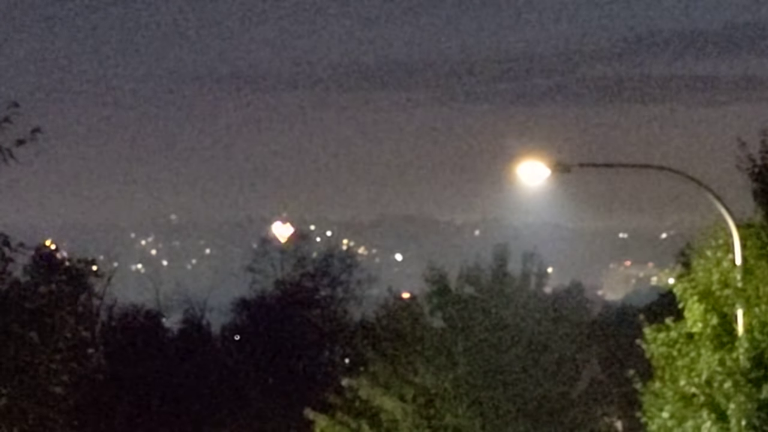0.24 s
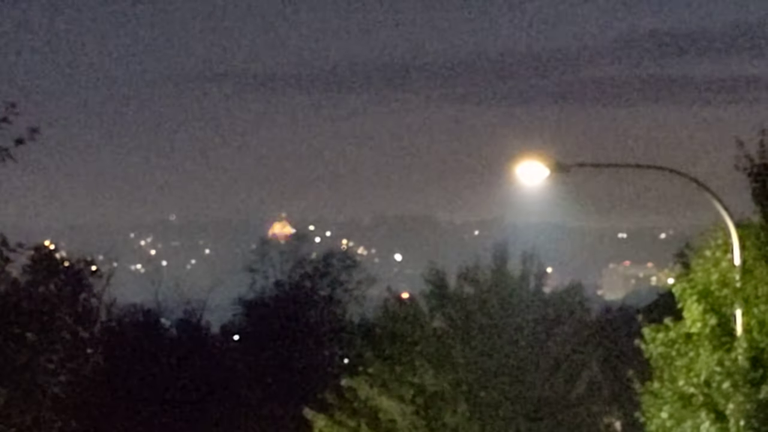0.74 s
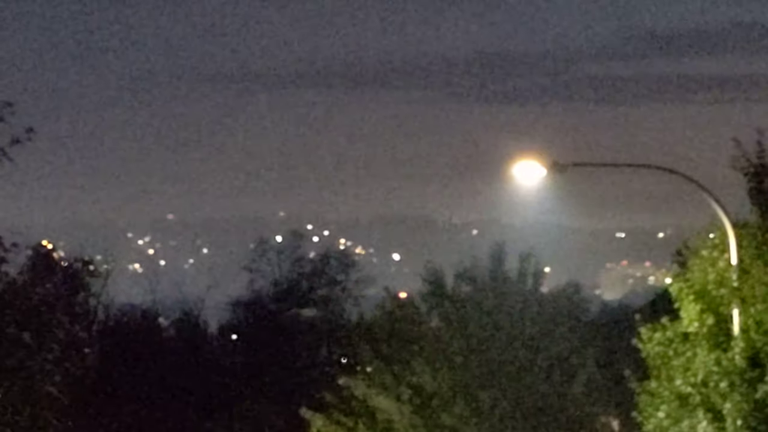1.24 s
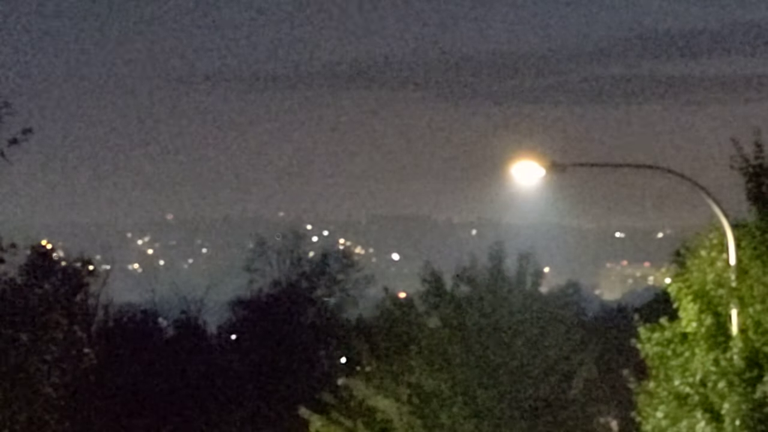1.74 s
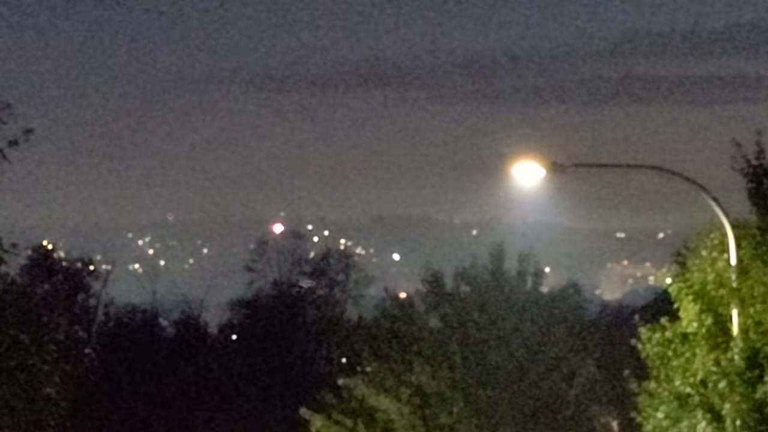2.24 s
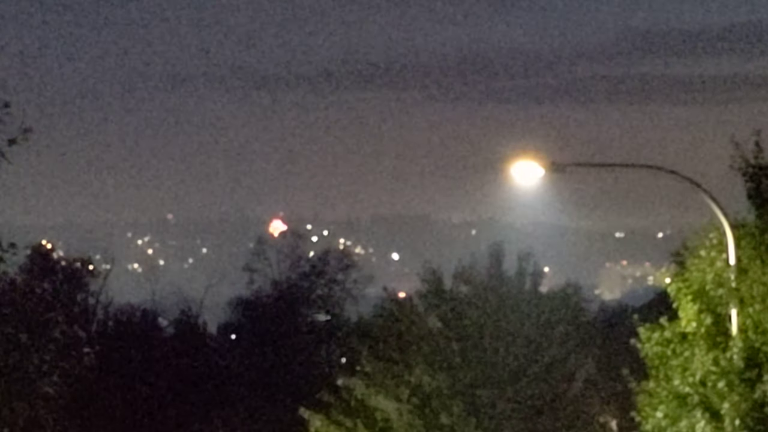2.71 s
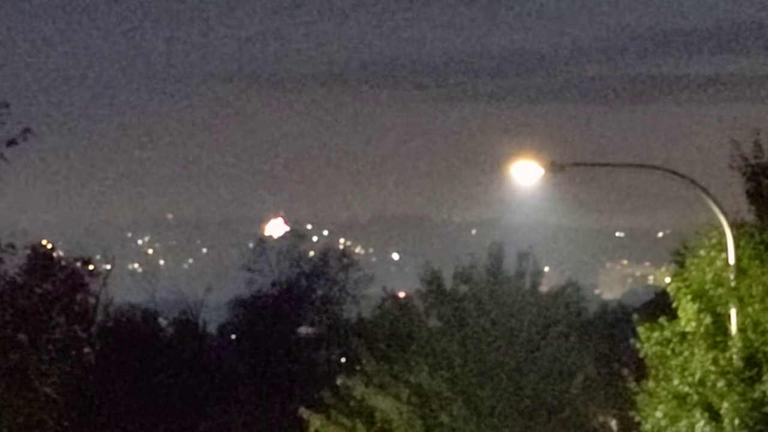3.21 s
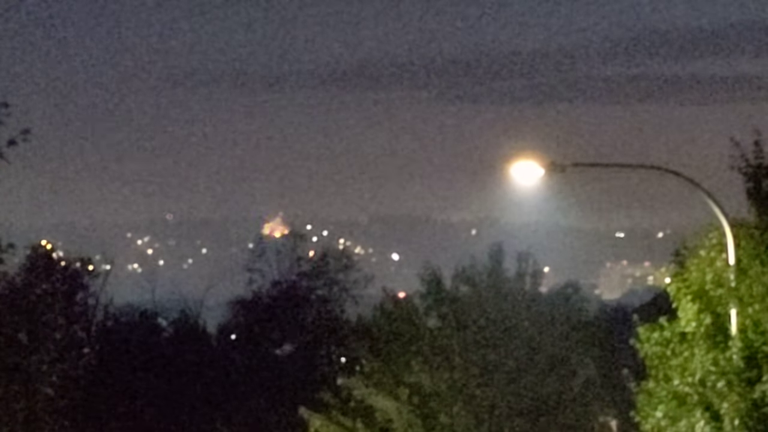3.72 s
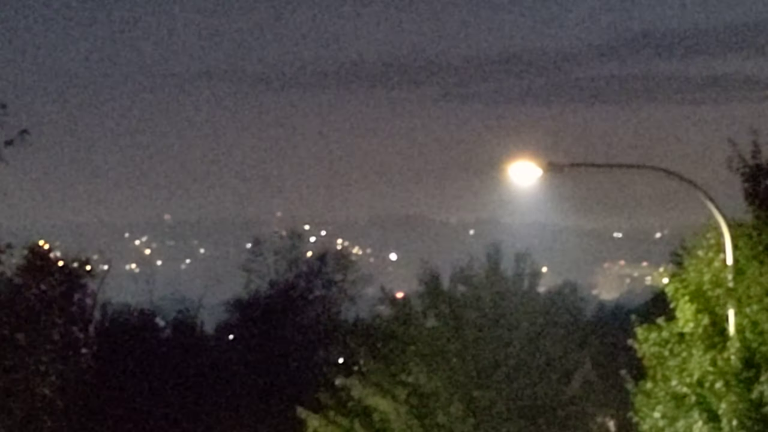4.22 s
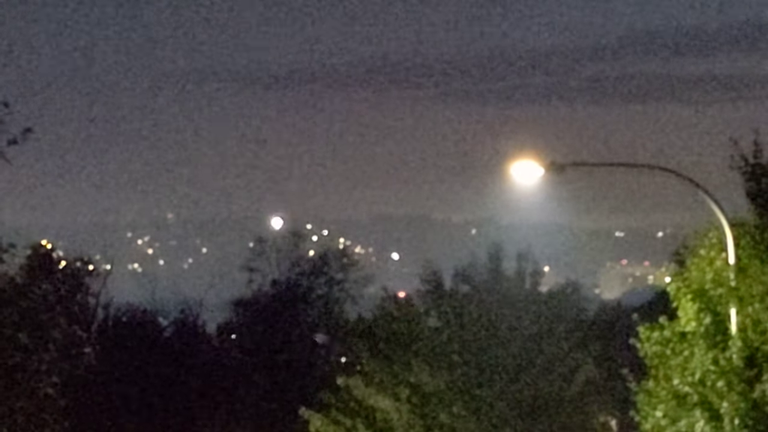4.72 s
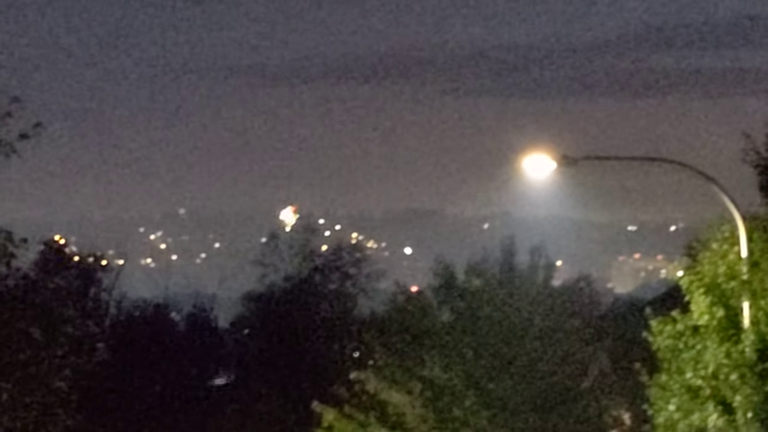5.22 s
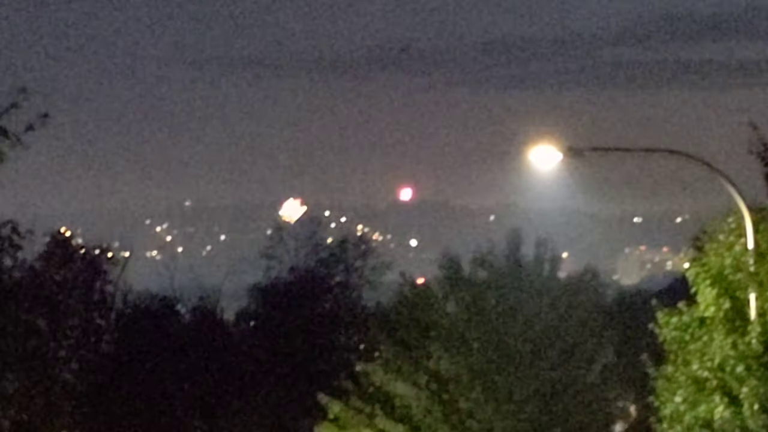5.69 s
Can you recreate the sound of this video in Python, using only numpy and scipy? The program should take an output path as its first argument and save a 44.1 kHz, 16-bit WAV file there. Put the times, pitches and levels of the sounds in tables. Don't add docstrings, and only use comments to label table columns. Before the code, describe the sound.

A quiet night outdoors above a town, with steady low road hum, gently swelling tyre hiss and faint microphone hiss. At 0 s the soft clatter and rumble of an earlier firework is fading. At 1.3 s a strong shell arrives: a short knock from the right, a heavier deep thump answering off a wall on the left about 40 ms later, then uneven rolling echoes. A second, lighter knock at 1.87 s brings a low flutter, and the rumble dies slowly with soft swells. Tiny dull pops from farther shells come at 2.5 and 2.9 s, in a quick run around 3.6 s, then near 3.84, 3.98 and 4.27 s. At 4.37 s a nearer shell gives a small bright snap and low thud; at 4.72 s a loud knock and boom clatter back with a quick high flutter and thick rumble. A weak last bang at 5.29 s trails off in echoes towards 6 s.

```python
import sys
import numpy as np
from scipy import signal
from scipy.fft import rfft, irfft, next_fast_len
from scipy.io import wavfile
from scipy.ndimage import uniform_filter1d

SR = 44100
rng = np.random.default_rng(int(sys.argv[2]) if len(sys.argv) > 2 else 0)


def natural_amplitude(level_db):
    exponent = np.asarray(level_db, float) / 20
    return 10 ** exponent


def generate_wav(sig):
    pcm = np.round(np.clip(np.atleast_2d(sig).T, -1, 1) * 32767).astype(np.int16)
    wavfile.write(sys.argv[1], SR, pcm)


N = 262395
HZ = np.fft.rfftfreq(2048, 1 / SR)
FRAMES = np.arange(N // 512 + 5) * 512 / SR


def evened(x):
    return x / np.sqrt(np.mean(x ** 2) + 1e-30)


def read(points, hz):
    f, value = np.transpose(points)
    return np.interp(np.log(hz + 1), np.log(f + 1), value)


def closed(points, hz):
    outside = (hz < points[0][0]) | (hz > points[-1][0])
    return np.where(outside, -120, read(points, hz))


def pair(left, other, same):
    same = np.clip(same, -1, 1)
    return np.array([left, same * left + np.sqrt(1 - same ** 2) * other])


def noise(db, same, patchy_db):
    a, b, c, d, patches = rng.standard_normal((len(FRAMES), len(HZ), 5)).T
    patches = uniform_filter1d(patches, size=12, axis=0)
    patches = evened(uniform_filter1d(patches, size=4, axis=1))
    spectra = pair(a + 1j * b, c + 1j * d, same[:, None]) * natural_amplitude(db + patchy_db * patches)
    sound = signal.istft(spectra, nperseg=2048, noverlap=1536)[1]
    return evened(sound[:, :N])


def lumps(per_s, depth_db):
    knots = rng.standard_normal(2000)
    drift = np.interp(np.arange(N) * per_s / SR, np.arange(len(knots)), knots)
    return evened(natural_amplitude(depth_db * drift))


def add(mix, s, sound, pan_db):
    part = mix[:, round(s * SR):][:, :len(sound.T)]
    sides = natural_amplitude(np.array([[.5], [-.5]]) * pan_db)
    part += (sound * sides)[:, :part.shape[1]]


def packet(hz, cycles, sag=0.074, narrow=3.02):
    u = np.arange(-1.5 * cycles / hz, 1.553 * cycles / hz, 1 / SR) * hz
    bell = np.exp(-(narrow * u / cycles) ** 2)
    swing = -np.cos(2 * np.pi * (u - sag * u ** 2 / cycles)) * bell
    return swing - bell * swing.sum() / bell.sum()


def thump(mix, s, db, hz, cycles, pan_db):
    wave = packet(hz, cycles)
    add(mix, s - len(wave) / 2 / SR, natural_amplitude(db) * wave, pan_db)


# (pitch [Hz], level [dB per Hz])
TOWN = [(13, -62), (22, -20.5), (35, -2), (81, 1), (108, -2.5), (213, -2), (273, -6.5), (404, -12),
        (438, -13), (585, -12), (849, -12.5), (1000, -4.5), (2240, -35), (3050, -51.5), (3960, -68),
        (6710, -120)]
# (pitch [Hz], likeness [-1 to 1])
TOWN_SAME = [(60, 1), (100, 0.81), (180, 0.89), (300, 0.53), (520, 0.88), (890, 0.75), (1520, 0.18),
             (2600, 0.076)]
# (time [s], tyre hiss [dB], nearness that lifts the treble [dB])
CARS = [(0, -6.5, -6.5), (0.401, -6, 4), (0.801, -2.3, 18), (1.201, -4, 7), (1.6, -5, 3.5),
        (2.299, -1.5, 10.5), (2.598, -3.5, 5), (2.903, 2, 2.5), (3.302, -1.5, 3.5), (3.7, -4, 3),
        (4.05, -3.2, 3), (4.25, -3, 8.5), (4.501, -4.5, 4.5), (5.3, -4, 8), (5.95, -6.5, 1.5)]


def town():
    town_db = -47.5
    s, tyre_db, near_db = np.transpose(CARS)
    hump = np.exp(-(np.log2((HZ + 1) / 1050) / 0.45) ** 2)
    treble = np.clip(np.log2((HZ + 1) / 1100), 0, 1.1)
    cars = hump[:, None] * np.interp(FRAMES, s, tyre_db)
    cars = cars + treble[:, None] * np.interp(FRAMES, s, near_db)
    return natural_amplitude(town_db) * noise(closed(TOWN, HZ)[:, None] + cars, read(TOWN_SAME, HZ), 0.74)


# (pitch [Hz], level [dB per Hz])
HISS = [(1800, -20.5), (2800, 2), (3400, -2), (3800, 1), (4800, -3.5), (5500, -2.5), (6400, -6.5),
        (7100, -3.5), (8200, -7.5), (9600, -5), (10400, -10.5), (11500, -9.5), (13500, -13), (16500, -12.5)]


def microphone_hiss():
    hiss_db = -76.5
    return natural_amplitude(hiss_db) * noise(closed(HISS, HZ)[:, None], 0 * HZ, .6)


# (time [s], rumble level [dB], clatter level [dB], rumble pitch [factor], nearness [dB])
BANGS = [
    (0, -45.5, -46.5, 1.1, 9.5),
    (1.317, -32, -44, 1.3, 2),
    (1.863, -34.5, -50, 1.67, 13.5),
    (4.365, -39.5, -50.5, 1.08, 21.5),
    (4.712, -28, -42.5, 1.23, 15.5),
    (5.286, -42, -48.5, 1.84, 13),
]
# (crest time [s], rumble level [dB], clatter level [dB], rise time [s], rumble pitch [factor])
SWELLS = [(.2, -47, -50, 0.043, 1.1), (.45, -46, -66, 0.058, 0.59), (.62, -48, -76, 0.042, .4),
          (1.418, -32, -42, .008, 1.5), (1.466, -27.5, -37.5, 0.052, 1.8), (1.639, -39, -50, 0.054, 0.93),
          (1.94, -32, -49, 0.022, 1.2), (2.06, -42, -52, 0.028, 0.5), (2.16, -41, -59, 0.027, 1.4),
          (2.298, -38.5, -51.5, 0.05, 1.6), (2.6, -43.5, -57.5, 0.079, 1.7), (2.95, -50, -59, 0.099, 0.53),
          (3.46, -47, -72, 0.079, 0.78), (4.446, -51, -48.5, 0.03, 0.91), (4.54, -48, -53, .07, .7),
          (4.63, -48, -61, 0.027, .45), (4.791, -29, -48.5, .03, 0.43), (4.82, -49, -42, 0.036, 1.4),
          (4.9, -34, -40, 0.034, 1.23), (5.001, -35, -43.5, 0.016, 0.72), (5.1, -40, -54, 0.074, 0.93),
          (5.35, -48, -45.5, 0.043, 1.6), (5.46, -41.5, -48.5, 0.036, 0.42), (5.799, -51, -61, 0.088, 0.88)]


def tails(t):
    street_t60, hills_t60 = 1.1, 8.3
    hills_db, clatter_hills_db = -11.5, -1
    build_s = 0.083
    front_t60 = .13
    fronts = ((0, 6.5), (0.033, 5))
    swell_fall = 1.35
    starts, near = [row[0] for row in BANGS], [row[-1] for row in BANGS]

    for s, rumble_db, clatter_db, pitch, near_db in BANGS:
        age, on = abs(t - s), np.clip((t - s) / .003, 0, 1)
        street = -60 * age / street_t60
        hills = hills_db - 60 * age / hills_t60
        rumble = natural_amplitude(rumble_db + street) ** 2 + natural_amplitude(rumble_db + hills) ** 2
        clatter = natural_amplitude(clatter_db + street) ** 2 + natural_amplitude(clatter_db + clatter_hills_db + hills) ** 2
        build = 1 - np.exp(-(age / build_s) ** 2)
        yield on * rumble, on * build * clatter, pitch, near_db, age
        for late_s, db in fronts:
            rise = np.clip((t - s - late_s) / 0.0025, 0, 1)
            front = rise * natural_amplitude(clatter_db + db - 60 * abs(age - late_s) / front_t60) ** 2
            yield 0 * t, front, pitch, near_db, age

    for s, rumble_db, clatter_db, rise_s, pitch in SWELLS:
        cause = np.searchsorted(starts, s) - 1
        width = rise_s * np.where(t < s, 1, swell_fall)
        bell = np.exp(-((t - s) / width) ** 2) * (t > starts[cause])
        age = s - starts[cause]
        yield bell * natural_amplitude(2 * rumble_db), bell * natural_amplitude(2 * clatter_db), pitch, near[cause], age


# (pitch [Hz], level [dB per Hz])
RUMBLE = [(15, -42.5), (25, -21), (55, 0), (107, 2.5), (151, 6.5), (412, -11.5), (480, -14), (626, -32),
          (700, -10), (910, -41.5), (1540, -120)]
CLATTER = [(210, -31), (350, -2.5), (500, -8.5), (700, -5), (1000, -7), (1400, -8.5), (1900, -17.5),
           (2500, -24), (3000, -36), (3500, -50.5)]
SIZZLE = [(2200, -23), (2800, -0.5), (3100, 3), (3400, -7.5), (3800, -3), (4300, -8), (5000, -19),
          (6000, -25), (7200, -31)]
# (pitch [Hz], likeness [-1 to 1])
ROLL_SAME = [(60, 1), (80, 1), (110, 0.4), (140, 0.93), (190, 0.57), (260, 0.49), (340, 0.63), (460, 0.12),
             (610, 1), (820, 0.35), (1090, -0.41), (1460, -0.14), (1950, 0.53), (2600, 0.063)]


def rolls():
    upper_share, sizzle_db = 0.17, -37.5
    air_db_per_s = 23
    t, same = np.arange(N) / SR, read(ROLL_SAME, HZ)
    deep = noise(closed(RUMBLE, HZ * 1.2)[:, None], same, 4.1) * lumps(35, 3.7)
    high = noise(closed(RUMBLE, HZ / 1.426)[:, None], same, 0.2) * lumps(45, 1.83)
    clatter = noise(closed(CLATTER, HZ)[:, None], same, 0.79) * lumps(90, .8) * lumps(320, 2.0)
    sizzle = noise(closed(SIZZLE, HZ)[:, None], same, 1.6)
    upper = signal.sosfiltfilt(signal.butter(2, 1200, "high", fs=SR, output="sos"), clatter)

    power = np.zeros((5, N // 32 + 2))
    coarse = np.arange(power.shape[1]) * 32 / SR
    for low, mid, pitch, near_db, age in tails(coarse):
        blend = np.clip(pitch - .5, 0, 1) * np.pi / 2
        upper_gain = natural_amplitude(2 * upper_share * near_db)
        sizzle_gain = natural_amplitude(2 * (sizzle_db + near_db - air_db_per_s * age))
        power = power + [low * np.cos(blend) ** 2, low * np.sin(blend) ** 2,
                         mid, mid * upper_gain, mid * sizzle_gain]
    layers = (deep, high, clatter - upper, upper, sizzle)
    gains = [np.interp(t, coarse, np.sqrt(p)) for p in power]
    return snap(t, sizzle) + sum(gain * layer for gain, layer in zip(gains, layers))


def snap(t, sizzle):
    snap_s, snap_db, t60, tilt_db = 4.365, -63.5, 0.071, 20
    size = next_fast_len(N)
    hz = np.clip(np.fft.rfftfreq(size, 1 / SR), 2000, 8000)
    tilt = natural_amplitude(tilt_db * np.log2(hz / 3000))
    bright = evened(irfft(rfft(sizzle, size) * tilt, size)[:, :N])
    rise = np.clip((t - snap_s) / 0.0023, 0, 1)
    return rise * natural_amplitude(snap_db - 60 * abs(t - snap_s) / t60) * bright


# (time [s], peak level [dB], 60 dB fall time [s], brightness [dB an octave], left over right [dB])
CRACKS = [(.034, -29.5, 0.077, -1, 4), (1.3195, -31, 0.069, 1, -9.5), (1.355, -25, .1, 0.5, 4),
          (1.371, -43.5, 0.088, 3, 4), (1.414, -35, 0.095, -1, -8), (1.861, -56, 0.22, 9.5, -9),
          (1.912, -40, 0.34, 4.5, 2.5), (4.364, -44, 0.1, 5.5, 10), (4.713, -31, 0.21, 3.5, -4),
          (4.748, -24.5, 0.15, 5, 3), (4.931, -23, 0.049, -2.5, 2), (4.986, -49, 0.11, -7, 4),
          (5.287, -42, 0.25, -4, -14), (5.333, -36, 0.15, -0.5, 3)]
# (pitch [Hz], level [dB per Hz])
CRACK = [(210, -33.5), (350, -0.5), (500, -4.5), (900, -12.5), (1400, -15), (1900, -17.5), (2700, -28),
         (3200, -43.5), (3700, -50.5), (5000, -83)]


def cracks():
    out, t = np.zeros((2, N)), np.arange(SR // 4) / SR
    hz = np.fft.rfftfreq(len(t), 1 / SR)
    same = read(ROLL_SAME, hz)
    rise = 1 - np.exp(-(t / 0.00069) ** 2)
    fade = np.cos(np.pi / 2 * t / t[-1])
    for s, db, t60, bright_db, pan_db in CRACKS:
        colour = natural_amplitude(closed(CRACK, hz) + bright_db * np.log2((hz + 1) / 1000))
        left, other = rfft(rng.standard_normal((2, len(t)))) * colour
        spray = evened(irfft(pair(left, other, same), len(t)))
        add(out, s, spray * natural_amplitude(db - 4.5 - 60 * t / t60) * rise * fade, pan_db)
    return out


# (centre time [s], peak level [dB], pitch [Hz], length [cycles], left over right [dB])
BOOMS = [(.09, -47, 137, 3.5, 0), (1.34, -13, 101, 1.47, -4), (1.359, -15.5, 120, 0.97, 13),
         (1.373, -12, 111.3, 2.1, 2.5), (1.388, -7, 89.4, 1.1, 2), (1.483, -14, 94.6, 1.08, 3),
         (1.505, -19.5, 114.5, 1.7, -2), (4.381, -19, 95, 1.8, 0.5), (4.41, -30.5, 86, 2.1, -1),
         (4.455, -15, 77.6, 2.2, 0.5), (4.514, -36.5, 93.6, 10, -3.5), (4.729, -14, 130, 1.2, -7.5),
         (4.756, -11.5, 124.5, 1.4, 3), (4.776, -16.5, 134.4, 6.9, 7.5)]


def booms():
    out = np.zeros((2, N))
    for s, db, hz, cycles, pan_db in BOOMS:
        thump(out, s, db, hz, cycles, pan_db)
    return out


# (centre time [s], peak level [dB], length [cycles], left over right [dB])
ECHOES = [(0.176, -36.5, 6.8, 4), (1.381, -23, 2.2, 10), (1.418, -28.5, 3.4, -1.5),
          (1.439, -23.5, 10.7, -12.5), (1.47, -17.5, 10.6, 7), (1.561, -26, 5.3, 2.5),
          (1.908, -29.5, 3.3, 11), (2.082, -38, 2.4, -15), (2.344, -30.5, 1.4, 0), (2.583, -35, 3.4, -7),
          (4.827, -26, 3.1, -2), (4.937, -27, 3.1, 0), (4.993, -25, 2.9, -2), (5.050, -29, 1.5, -4),
          (5.097, -33, 1.9, -8)]


def house_echoes():
    out = np.zeros((2, N))
    for s, db, cycles, pan_db in ECHOES:
        thump(out, s, db, 197.3, cycles, pan_db)
    return out


# (centre time [s], peak level [dB], pitch [Hz], left over right [dB])
KNOCKS = [
    (1.327, -22.5, 233, -20.5),
    (1.869, -17.5, 257, -12),
    (1.879, -28.5, 222, -13.5),
    (4.369, -32, 181, -8),
    (4.719, -17, 223, -10),
    (4.744, -27, 248, -8),
    (5.292, -32.5, 268, -18),
]


def knocks():
    tick_lead_s, tick_db = .0052, -23.5
    out = np.zeros((2, N))
    for s, db, hz, pan_db in KNOCKS:
        thump(out, s, db, hz, 2.4, pan_db)
        thump(out, s - tick_lead_s, db + tick_db, 675, 1.25, pan_db / 2)
    return out


# (centre time [s], peak level [dB], pitch [Hz], length [cycles], left over right [dB])
FLUTTERS = [
    (1.924, -25, 268, 7.1, 10),
    (2.630, -40.5, 347, 15, 9),
    (4.754, -31.5, 1410, 26, -2),
    (5.342, -37.5, 414, 14.3, 6),
]


def flutters():
    out = np.zeros((2, N))
    for s, db, hz, cycles, pan_db in FLUTTERS:
        thump(out, s, db, hz, cycles, pan_db)
    return out


# (centre time [s], peak level [dB], pitch [Hz], length [cycles], left over right [dB])
POPS = [
    (2.497, -31, 490, 2.2, -1),
    (2.913, -38, 530, 1.3, 0),
    (3.556, -31.5, 563, 1.24, -2),
    (3.609, -34, 543, 2.1, .5),
    (3.655, -43, 590, 2.9, -1.5),
    (3.836, -32.5, 545, 1.5, .1),
    (3.975, -34, 543, 2.6, 0),
    (4.238, -43, 1210, 1.5, 7),
    (4.274, -34, 726, 1.6, 1),
]


def pops():
    out = np.zeros((2, N))
    for s, db, hz, cycles, pan_db in POPS:
        thump(out, s, db, hz, cycles, pan_db)
    return out


def scene():
    bangs = cracks() + booms() + house_echoes() + knocks() + flutters()
    return town() + rolls() + bangs + pops()


def roll_off(x):
    return signal.sosfilt(signal.butter(12, 15740, fs=SR, output="sos"), x)


def record(dry):
    cut = signal.sosfiltfilt(signal.butter(4, 37, "high", fs=SR, output="sos"), dry)
    return roll_off(cut + microphone_hiss())


dry = scene()
out = record(dry)
generate_wav(out)
```